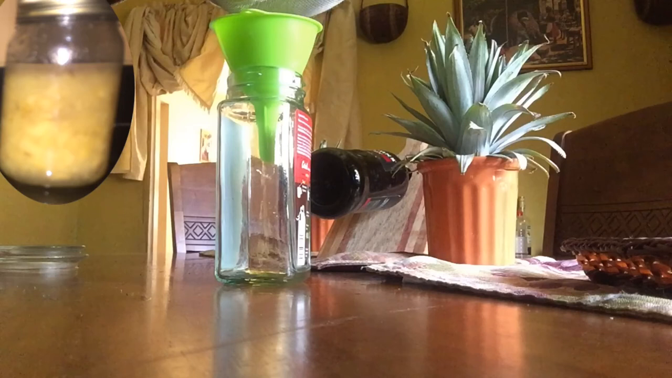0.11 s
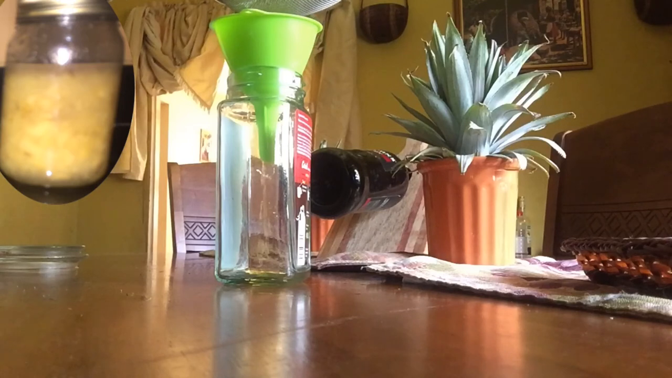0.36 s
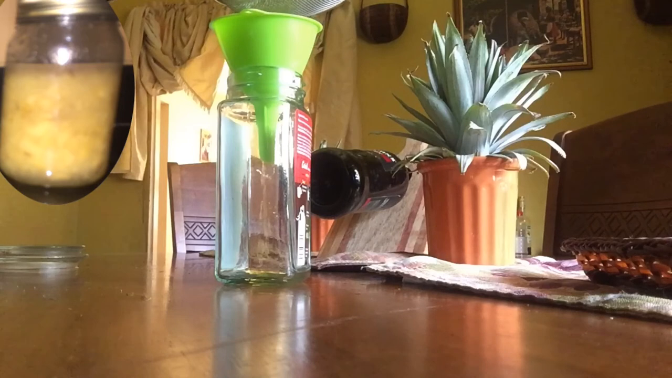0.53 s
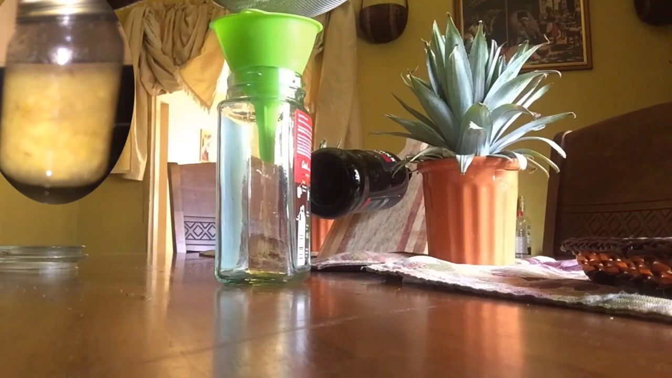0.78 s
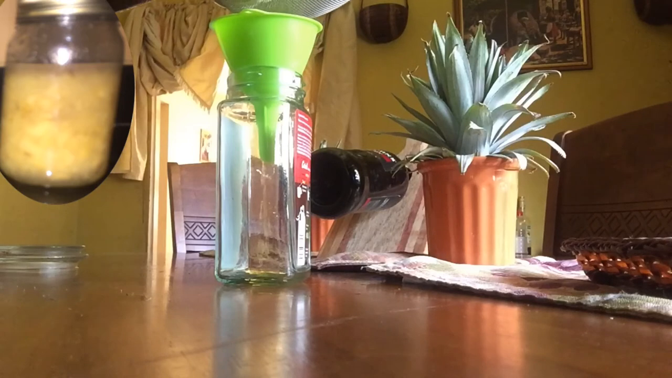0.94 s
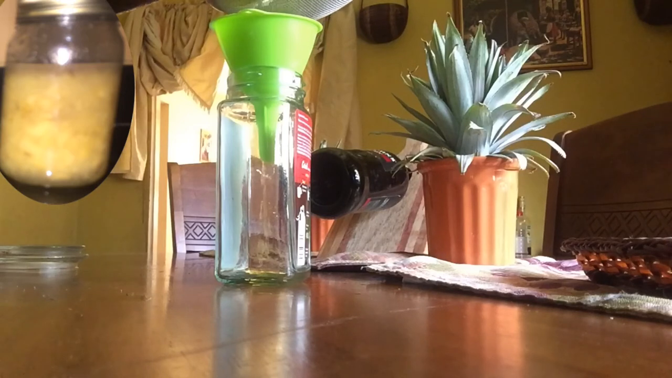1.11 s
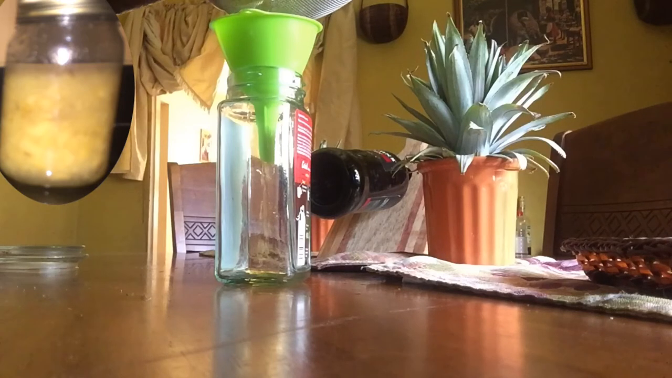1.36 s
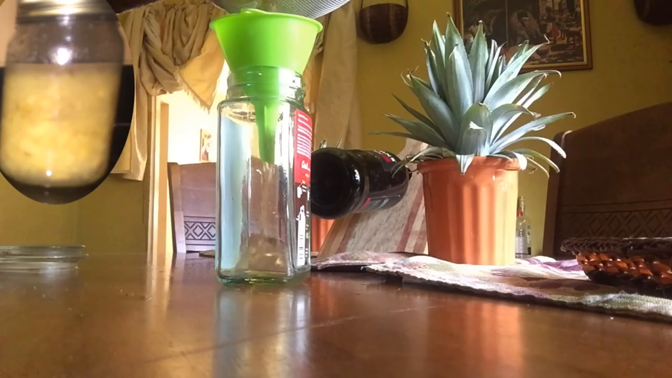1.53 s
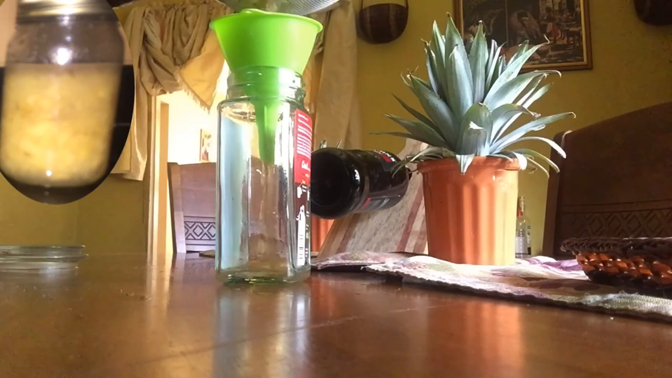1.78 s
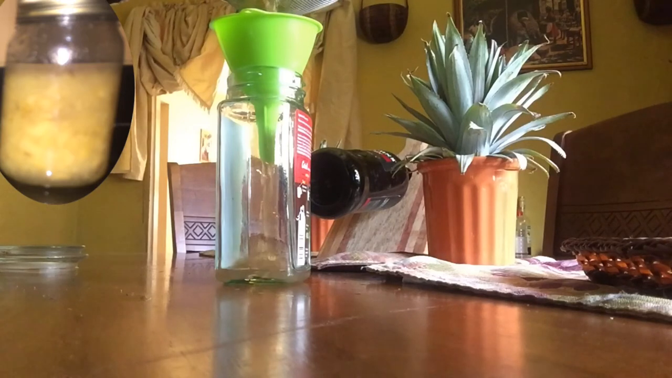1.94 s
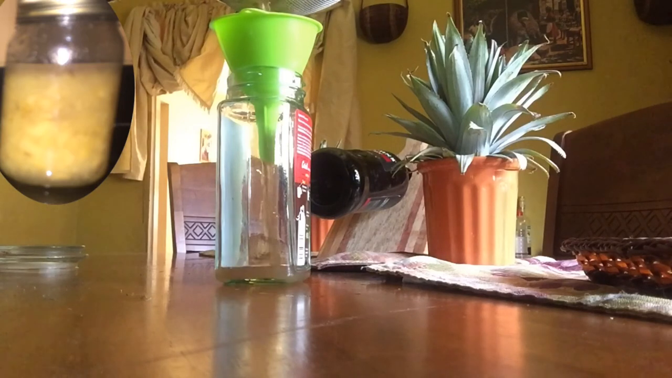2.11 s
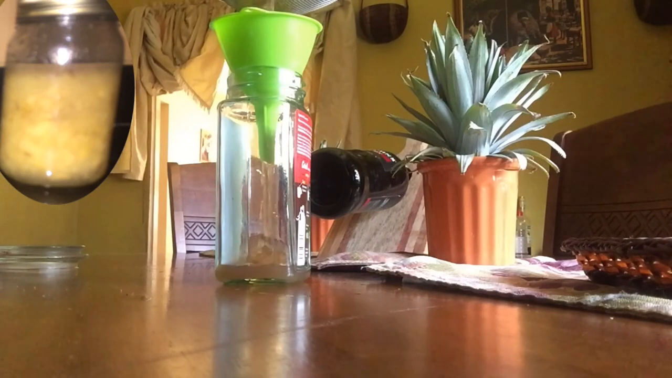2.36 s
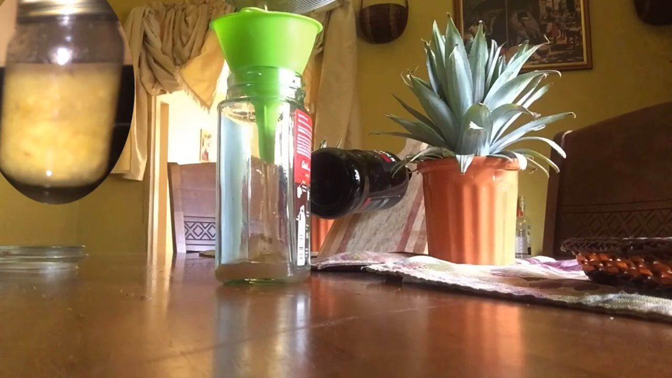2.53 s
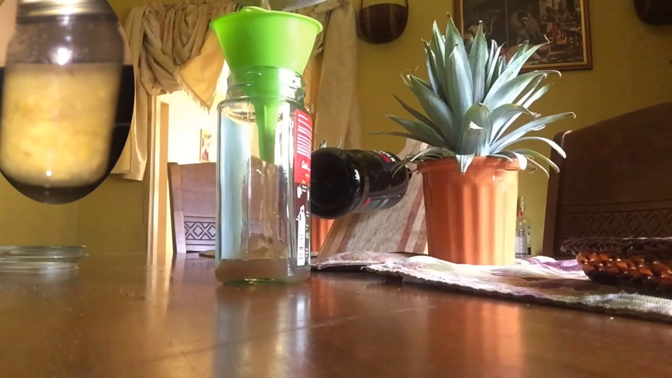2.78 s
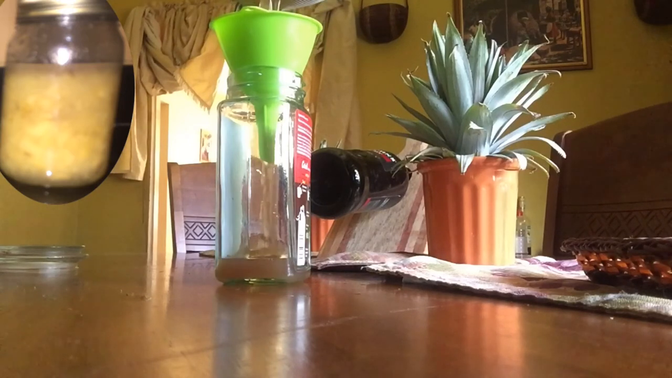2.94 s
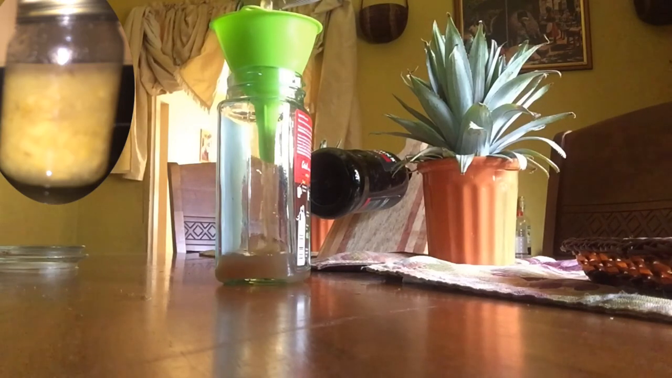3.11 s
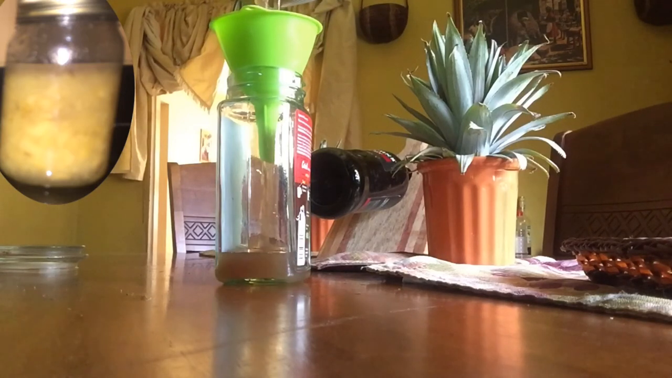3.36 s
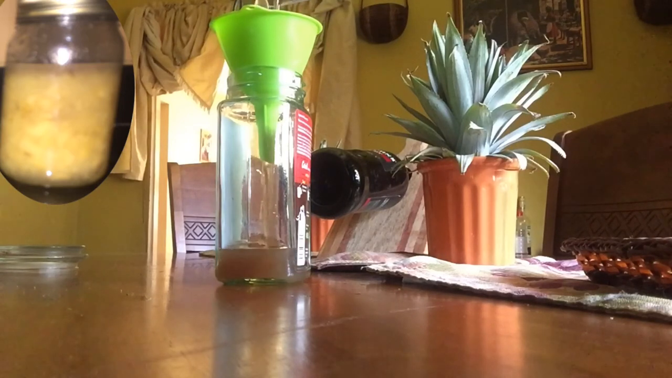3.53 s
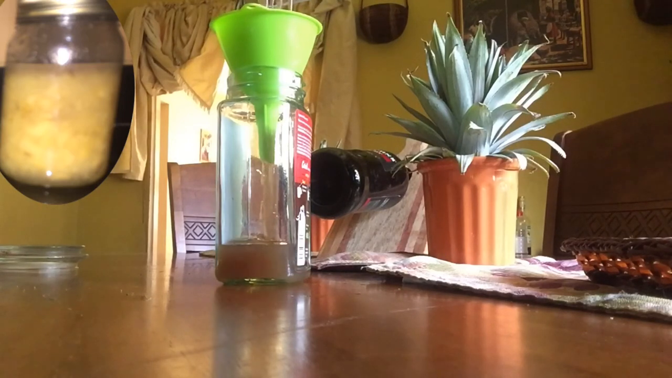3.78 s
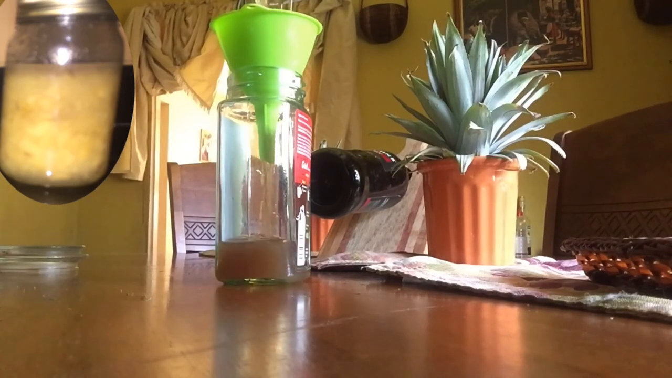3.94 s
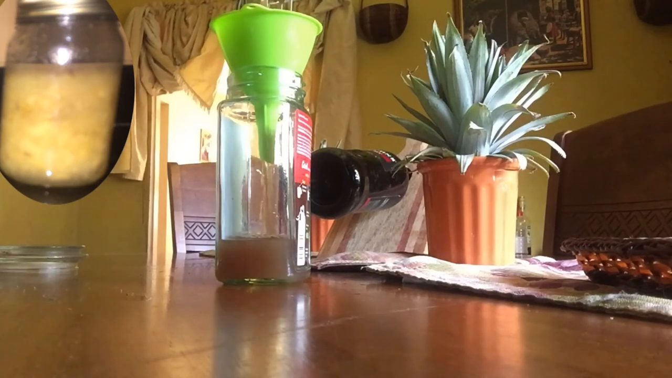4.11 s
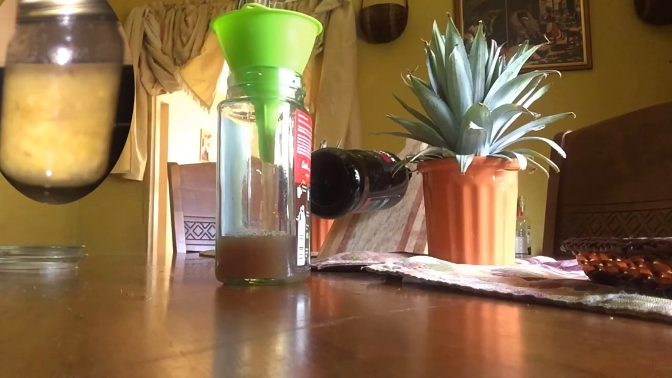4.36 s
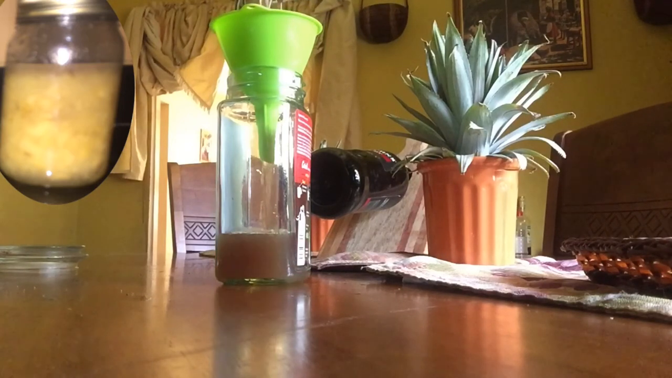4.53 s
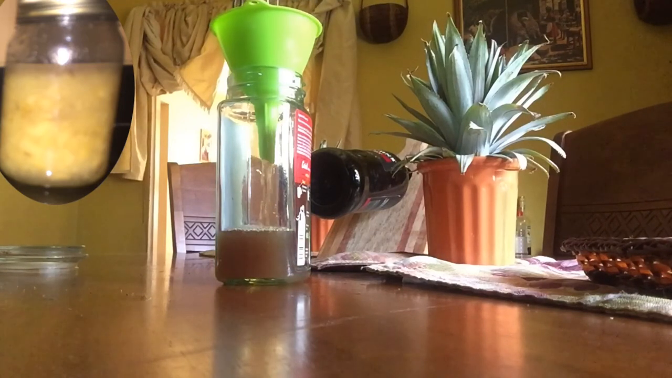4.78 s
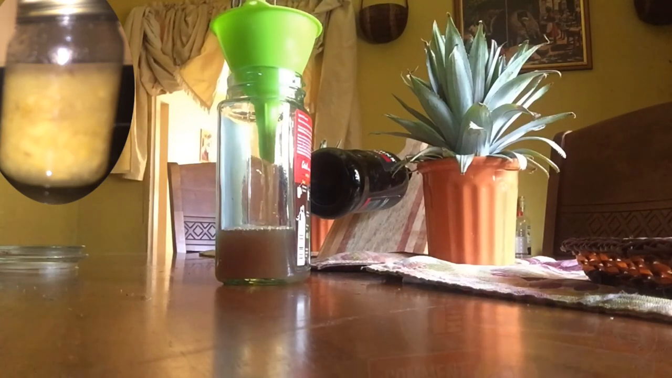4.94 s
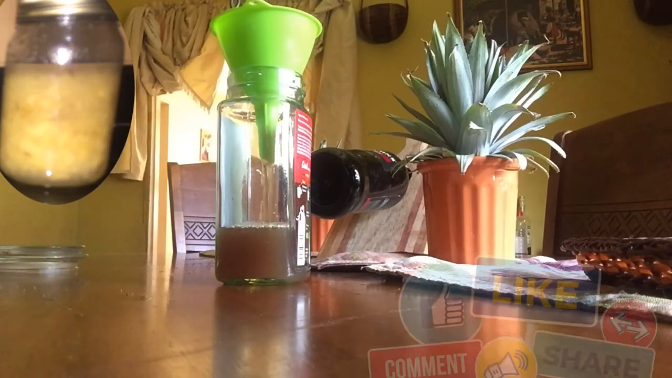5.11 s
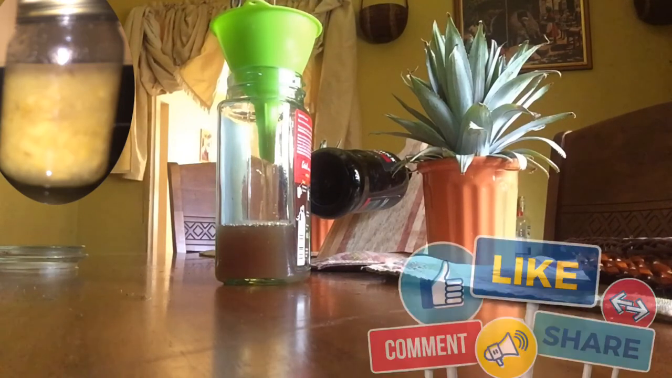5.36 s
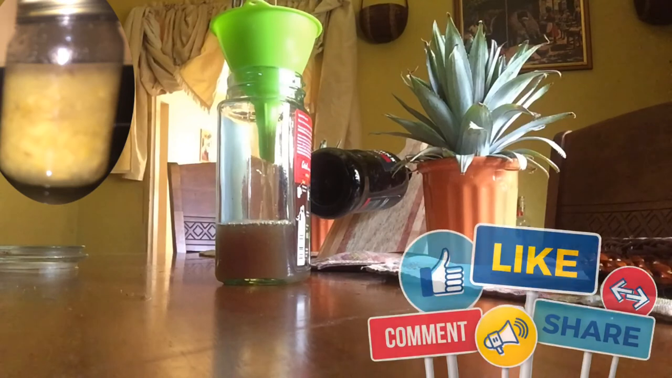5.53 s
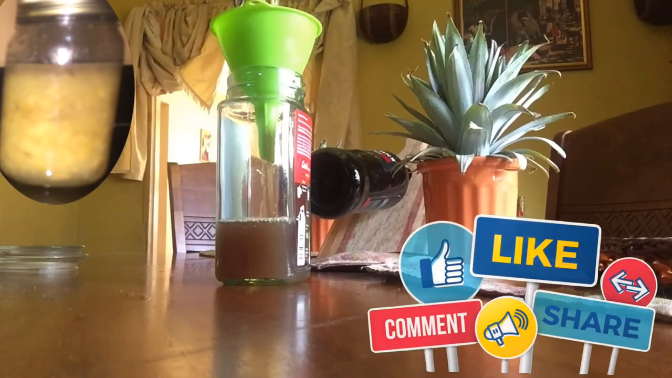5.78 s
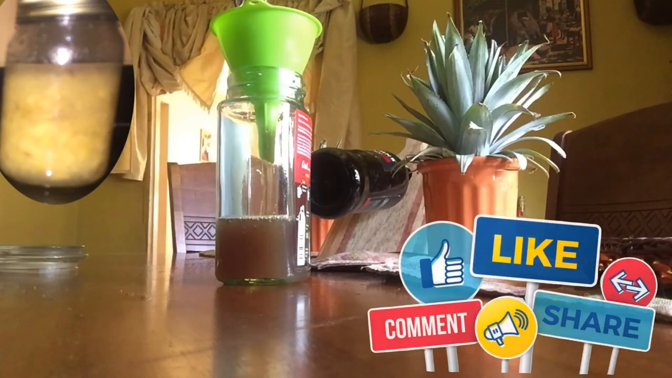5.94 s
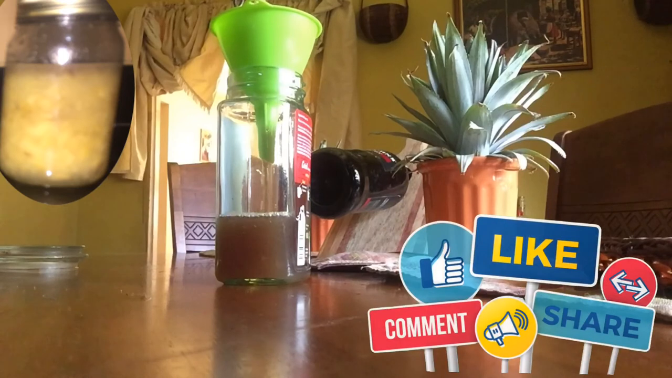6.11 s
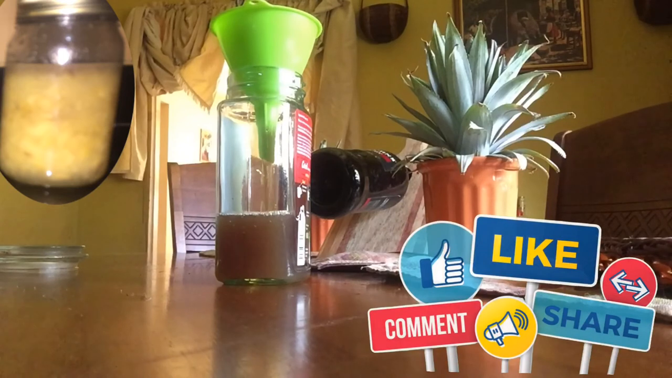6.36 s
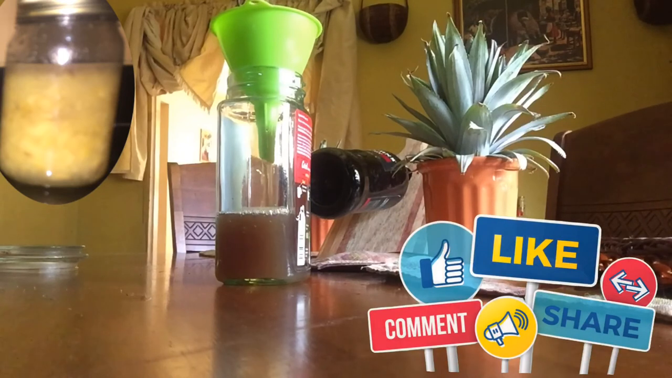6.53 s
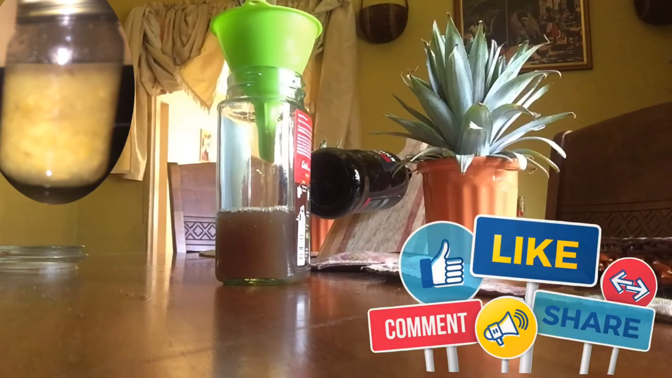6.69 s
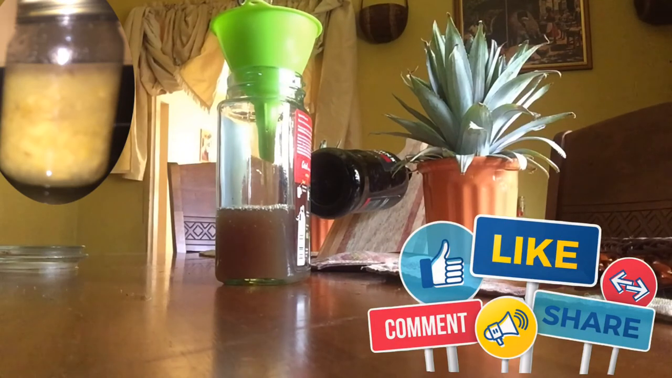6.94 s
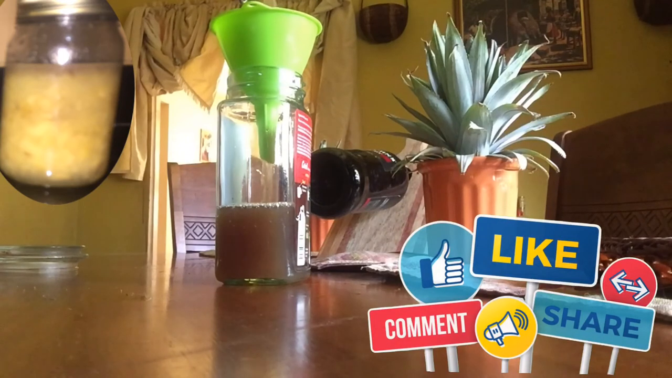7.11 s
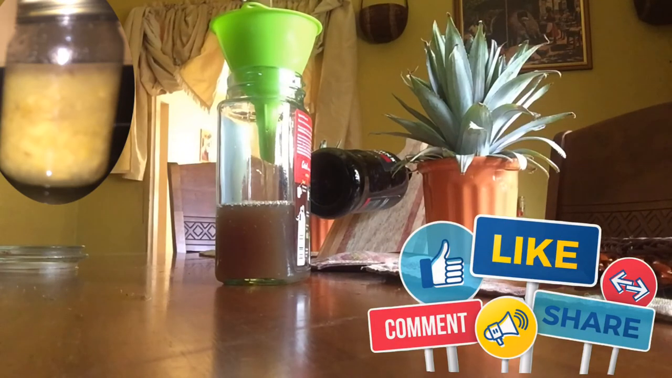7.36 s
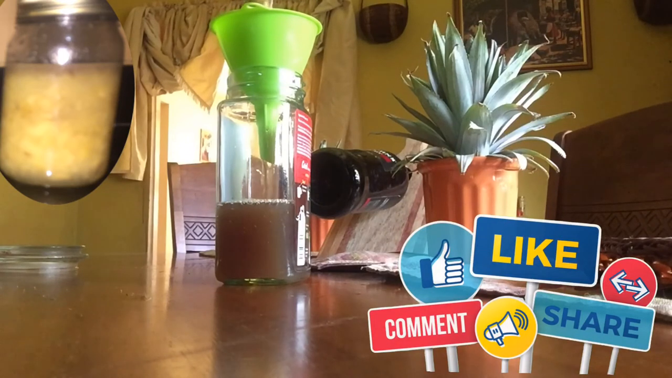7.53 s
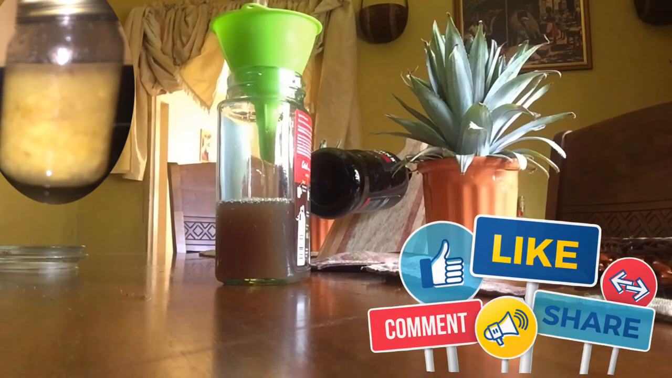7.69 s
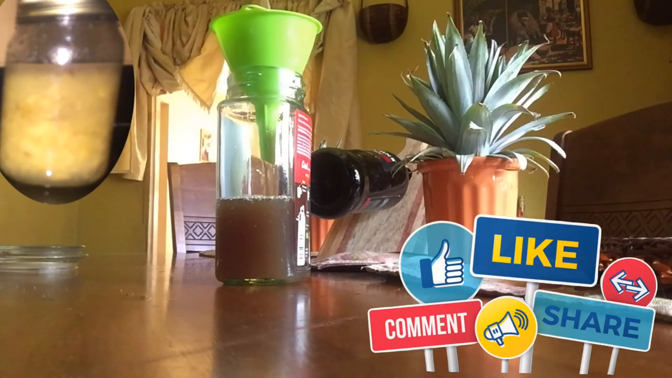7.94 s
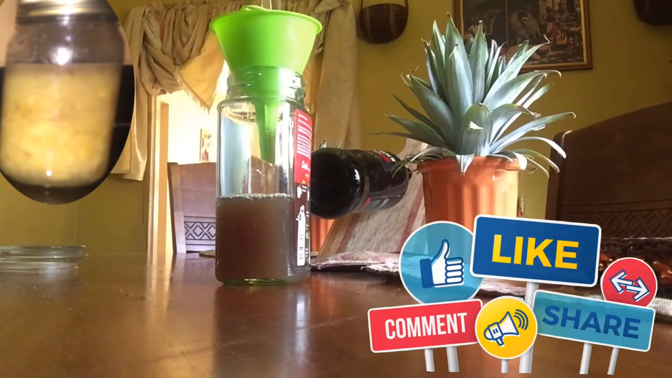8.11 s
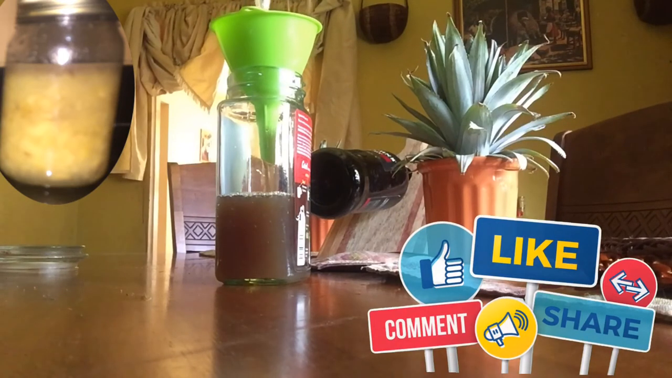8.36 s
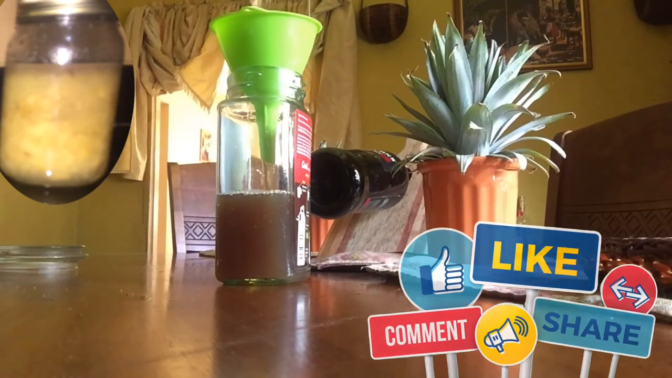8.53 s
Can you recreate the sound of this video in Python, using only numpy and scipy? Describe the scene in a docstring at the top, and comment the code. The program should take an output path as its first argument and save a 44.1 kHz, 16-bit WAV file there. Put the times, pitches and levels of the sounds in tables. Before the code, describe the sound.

After a quiet hissing start, a thin wet trickle thickens into throaty glugging as a bottle fills through a funnel, with small ticks and plips.

```python
"""Room hiss and a low wavering hum are heard first; a gliding drone soon joins them.
Syrup then runs through a sieve and a plastic funnel into a glass bottle, pattering and spitting: bubble swarms
and noise bursts. Once the spout floods, gulps of air glug: damped sines for bubble, overtone and bottle air.
Decaying sines also make small bubbles, sharp ticks of drops and sieve, and chinks of sieve and funnel on the neck.
The room answers the pour with a diffuse tail; the recorder cuts the top."""
import sys
import numpy as np
from scipy import signal
from scipy.fft import rfft, irfft
from scipy.io import wavfile

SR = 44100
rng = np.random.default_rng(int(sys.argv[2]) if len(sys.argv) > 2 else 0)


def persist_wave(psi):
    """Save psi, clipped to +-1, as 16-bit WAV."""
    counts = np.round(np.clip(psi, -1, 1) * 32767).astype(np.int16)
    wavfile.write(sys.argv[1], SR, np.atleast_2d(counts).T)


N = 378449
TIME = np.arange(N) / SR

# Levels in the tables are relative: the gains set in scene() are added to them.
# gulps of air: (time [s], level [dB], bubble pitch [Hz], overtone level above the glug [dB])
GULPS = [(2.565, -36, 622, -15), (2.618, -30.5, 478, -28), (3.156, -33.5, 654, -16),
         (3.238, -33.5, 700, -5.5), (3.396, -24.5, 680, -24), (3.466, -16, 672, -31),
         (3.609, -9.5, 664, -43), (3.655, -22, 597, -38), (3.676, -19, 560, -24), (3.783, -19.5, 662, -24),
         (3.826, -17.5, 594, -34), (3.924, -18, 474, -26), (3.954, -16.5, 620, -37),
         (4.003, -14.5, 634, -29), (4.103, -16.5, 629, -16), (4.17, -8.5, 574, -28), (4.2, -11.5, 581, -39),
         (4.24, -9.5, 582, -23.5), (4.33, -14.5, 509, -19.5), (4.378, -10.5, 587, -28),
         (4.452, -13, 486, -29), (4.529, -17, 465, -36), (4.555, -17.5, 503, -33), (4.62, -8.5, 444, -24),
         (4.652, -13.5, 455, -32), (4.692, -13.5, 493, -43), (4.873, -20, 660, -25.5),
         (4.907, -19.5, 632, -23.5), (4.964, -6.5, 648, -32), (5.059, -21.5, 644, -20.5),
         (5.177, -13.5, 598, -28.5), (5.224, -20, 570, -32), (5.248, -11, 570, -40),
         (5.333, -16.5, 612, -25.5), (5.363, -11, 609, -19.5), (5.392, -10, 615, -23.5),
         (5.48, -22, 680, -18), (5.537, -7, 579, -30.5), (5.611, -19.5, 589, -25), (5.711, -16, 667, -23),
         (5.777, -3.5, 599, -21), (5.847, -20.5, 650, -16), (5.874, -15.5, 610, -26),
         (5.927, -14, 650, -42), (6.021, -14.5, 664, -20), (6.229, -27, 500, -41), (6.291, -26, 495, -26),
         (6.349, -24.5, 575, -18), (6.421, -26.5, 612, -25), (6.551, -6.5, 598, -27),
         (6.661, -18, 662, -23.5), (6.784, -21.5, 632, -27), (6.861, -19.5, 623, -27),
         (6.904, -26, 650, -14), (7.005, -14.5, 600, -27), (7.082, -19.5, 600, -29), (7.146, -12, 604, -20),
         (7.186, -22.5, 617, -22), (7.236, -16, 585, -20), (7.264, -19.5, 509, -30),
         (7.402, -15, 586, -17.5), (7.494, -23, 653, -24), (7.555, -22.5, 660, -15),
         (7.587, -13.5, 637, -15), (7.732, -19.5, 604, -21), (7.823, -14, 600, -19.5),
         (7.928, -24, 600, -21.5), (7.988, -18, 606, -18), (8.104, -25, 570, -31),
         (8.135, -19.5, 580, -17.5), (8.264, -19, 397, -20.5)]
# modes of the bottle's air, rung by every gulp: (frequency [Hz], level [dB], t60 [s])
BOTTLE_MODES = [(256.7, -1.8, 0.165), (97.2, -19, 0.14), (188, -26, 0.038), (343.3, -6, 0.12)]
# narrow resonances that hold on to the bubbles' sound: (frequency [Hz], width [Hz], level [dB])
HOLLOW_RESONANCES = [(491, 12, 0.5), (584, 11, -8.5), (665.5, 20, -5), (936, 25, 3), (1130, 50, -12.5)]
# colour of the slosh: (frequency [Hz], level [dB])
SLOSH_COLOUR = [(250, -7.5), (420, 6.5), (700, 1.5), (900, -9), (1200, -11.5), (1500, -31), (2500, -39.5),
                (3200, -35.5)]
# the running stream: (time [s], flow into the bottle [dB], spatter on the funnel [dB])
STREAM_LEVELS = [(1.4, -51, -82), (1.62, -50, -85.5), (2.88, -44.5, -65.5), (3.22, -38, -56),
                 (3.68, -38.5, -59), (3.98, -33.5, -52.5), (4.16, -32.5, -58.5), (4.5, -30.5, -56.5),
                 (4.92, -34, -60.5), (5.8, -35.5, -60), (6.36, -40, -67), (6.98, -41, -69),
                 (7.3, -35.5, -64.5), (7.78, -41.5, -67.5), (8.04, -40.5, -66), (8.58, -45, -68.5)]
# gushes from the sieve: (time [s], half length [s], extra level [dB])
SIEVE_GUSHES = [(1.68, 0.09, 7.5), (2.076, 0.056, 13), (2.456, 0.093, 7), (3.856, 0.13, 6),
                (4.588, 0.064, 7), (7.188, .07, 7.5)]
# colour of the stream's larger bubbles: (frequency [Hz], level [dB])
BURBLE_COLOUR = [(430, -10.5), (660, -0.5), (800, -18), (950, -14), (1160, -12), (1400, -26)]
# colour of the patter: (frequency [Hz], level [dB])
PATTER_COLOUR = [(1400, -6.5), (1750, -12), (2100, -8.5), (2430, -1), (2750, -6), (3080, 0), (3400, -10.5),
                 (4200, -14)]
# colour of fizz, spit and cracks: (frequency [Hz], level [dB])
SPRAY_COLOUR = [(1500, -27), (2500, 2.5), (4000, -16), (5500, -10.5), (7200, 0.5), (9000, 0.5), (10200, -4),
                (11500, -1.5), (16000, -12)]
# sharp ticks, drops on the funnel and taps of the sieve:
# (time [s], treble level [dB], funnel level [dB], ping pitch [Hz])
SHARP_TICKS = [(1.6831, -43, -76, 8540), (1.9897, -40, -40.5, 11300), (2.2089, -28.5, -49.5, 8300),
               (2.6194, -33, -54, 12800), (2.6888, -42, -49, 9530), (2.9894, -37.5, -36.5, 7040),
               (3.1662, -34, -56, 6800), (3.2797, -30, -48, 6900), (3.469, -38.5, -43, 9000),
               (3.609, -38.5, -59, 8840), (3.6302, -44, -44, 6550), (3.832, -37, -34.5, 7250),
               (3.8538, -30.5, -32.5, 7850), (3.8697, -27.5, -31.5, 7660), (4.0928, -39, -39, 7380),
               (4.1065, -28.5, -50, 7400), (4.1208, -42, -30.5, 7250), (4.1297, -28.5, -31, 6840),
               (4.2867, -48, -37.5, 7310), (4.3575, -42, -53, 13400), (4.4225, -49, -36.5, 7460),
               (4.4886, -52, -38, 10900), (4.5324, -49, -34, 6470), (4.9622, -35, -61, 6470),
               (5.0764, -44, -33.5, 7170), (5.248, -36.5, -55, 12500), (5.925, -37, -59, 9600),
               (5.9688, -43, -46.5, 8330), (6.0062, -27, -34, 6670), (6.1429, -35.5, -55, 9800),
               (6.548, -35.5, -45.5, 10950), (6.781, -43.5, -47, 8270), (7.0034, -40.5, -49, 12200),
               (7.0768, -44, -48, 9550), (7.1021, -33, -38.5, 7130), (7.8234, -34, -41, 9900),
               (8.1532, -44, -45, 9350), (8.174, -41, -34.5, 6700), (8.4714, -36.5, -69, 6200)]
# modes of the plastic funnel's wall: (frequency [Hz], level [dB], t60 [s])
FUNNEL_MODES = [(1522, -6.5, 0.049), (1790, -4.5, 0.02), (1995, -4, 0.041), (2444, 2.5, 0.038),
                (2520, 6.5, 0.01), (2993, -6.5, 0.044), (4150, -18.5, 0.026)]
# the clearest single bubbles: (time [s], level [dB], pitch [Hz])
SINGLE_BUBBLES = [(3.4, -33, 806), (3.43, -33, 830), (3.47, -29, 784), (3.53, -31.5, 760),
                  (4.597, -36, 2530), (4.653, -38.5, 2980), (4.723, -41.5, 2960), (4.809, -44, 3010),
                  (4.879, -41, 1890), (4.74, -42, 1870), (4.91, -43, 1950), (5.167, -41, 2510),
                  (5.219, -43.5, 2380), (5.334, -41, 2960), (5.723, -43, 2460), (5.847, -38.5, 2810),
                  (5.886, -37, 2990), (6.036, -43, 3760), (6.79, -44, 2930), (6.985, -50, 2810),
                  (7.435, -42.5, 2700), (7.49, -44, 2760), (7.585, -36, 2697)]
# touches of sieve and funnel against the bottle's neck: (time [s], level [dB], brightest pitch [Hz])
NECK_TOUCHES = [(1.735, -58, 4700), (2.044, -51.5, 8800), (2.446, -41.5, 5230), (2.448, -49, 3840),
                (2.494, -46, 3840), (2.624, -45.5, 3100), (2.635, -56, 11300), (2.9, -56, 3120),
                (2.997, -45, 3120), (3.065, -54.5, 5600), (7.079, -51, 5070), (7.819, -40.5, 3700)]
# modes rung by those touches: (frequency [Hz], level [dB], t60 [s])
GLASS_MODES = [(3106, 0, .17), (3838, -4, .11), (4441, -11, .12), (4776, -7, .2), (5100, -4, .14),
               (5566, -2, .19), (7200, -7, .18), (8200, -3, .13), (9100, -5, .08), (11350, -3, .14)]
# the low drone: (time [s], level [dB])
DRONE_LEVELS = [(0, -76), (.6, -52), (1.1, -51.5), (1.7, -56), (3.7, -51.5), (3.95, -32.5), (4.6, -34),
                (4.85, -45), (5.5, -44.5), (6.1, -50), (6.85, -43), (7.3, -42.5), (7.7, -54), (8.2, -38.5),
                (8.58, -46.5)]
# spectrum of the room's hiss: (frequency [Hz], level per hertz [dB])
ROOM_SPECTRUM = [(100, -8.5), (150, -15), (195, -3.5), (230, -13), (295, 0), (360, -12.5), (450, -21.5),
                 (700, -21.5), (1100, -29.5), (2000, -35), (5000, -39), (7000, -41.5), (10500, -44),
                 (16000, -46.5)]

OVERTONE_HZ, OVERTONE_SPREAD = 1123, .045  # every glug's overtone, and its scatter as a share
AIR_CORNER_HZ, AIR_DB_PER_OCTAVE = 560.5, -26  # bubbles above this pitch are too small to thump the air fully
AIR_DB_PER_S = 0.65  # the thump grows as the bottle fills
AIR_HOLD_S = .07  # how long the bottle's air rings before it drops off sharply
# a high mode of the air column climbs from the flooding on
COLUMN_HZ, COLUMN_HZ_PER_S, COLUMN_TOP_HZ = 1638, 150, 2286
POUR_S = 1.37  # the syrup reaches the funnel
FLOOD_S, FLOOD_SCALE_S = 2.88, .2  # the spout floods, and the time scale of that change
DRONE_HZ, DRONE_OCTAVES_PER_S = 41.66, .176  # pitch at time 0, and its steady climb
DRONE_SINKS_S, DRONE_SINK_SCALE_S, DRONE_END_HZ = 7.0, 0.25, 48.5  # then it sinks to its last pitch
HUM_HZ, HUM_DB = 76.4, -55.5
HUM_WAVER, HUM_WAVERS_PER_S = 0.0355, 3  # scatter as a share of the pitch, and new random values a second
ROOM_TONE_DB = -53.5
TOP_HZ = 15900  # the recorder's upper limit


def glugs(bubble_db, air_db, overtone_db, bubble_t60, overtone_t60, damping, lead_s,
          slosh_db, slosh_t60, drop_share, column_db, column_t60):
    """Coupled resonance: each gulp rings as a bubble, thumps the bottle's air and sloshes."""
    bubble, air, slosh = np.zeros(N), np.zeros(N), np.zeros(N)
    # after AIR_HOLD_S the ring of the air drops off sharply by drop_share
    hold = 1 - np.clip(drop_share, 0, 1) * (1 - np.exp(-(TIME / AIR_HOLD_S) ** 6))
    for s, db, hz, top_db in GULPS:
        octaves_above = max(np.log2(hz / AIR_CORNER_HZ), 0)
        thump_db = AIR_DB_PER_OCTAVE * octaves_above + AIR_DB_PER_S * (s - FLOOD_S) + air_db
        # the more a bubble drives the air, the faster it dies
        t60 = bubble_t60 * np.clip(undb(-damping * thump_db), .5, 2)
        column_hz = min(COLUMN_HZ + COLUMN_HZ_PER_S * (s - FLOOD_S), COLUMN_TOP_HZ)
        add(air, s, undb(db + column_db) * ring(column_hz, column_t60, attack_s=0.0065))

        add(bubble, s - lead_s, undb(db + bubble_db) * ring(hz, t60, attack_s=0.0036, glide=0.047))
        top_hz = OVERTONE_HZ * (1 + OVERTONE_SPREAD * rng.standard_normal())
        overtone = ring(top_hz, overtone_t60, attack_s=0.0032, glide=0.025)
        add(bubble, s - lead_s, undb(db + top_db + overtone_db) * overtone)
        add(slosh, s, undb(db + slosh_db) * burst(slosh_t60))

        sway = 1 + 0.018 * rng.standard_normal()  # the plug of syrup in the spout is never quite the same
        for mode_hz, mode_db, mode_t60 in BOTTLE_MODES:
            thump = ring(mode_hz * sway, mode_t60, attack_s=0.0051)
            add(air, s - lead_s, undb(db + thump_db + mode_db) * thump * hold[:len(thump)])
    held = np.zeros(N)
    for hz, width, db in HOLLOW_RESONANCES:
        held += undb(db) * signal.lfilter(*signal.iirpeak(hz, hz / width, SR), bubble)
    return bubble + air + held + colour(slosh, SLOSH_COLOUR)


def films(fizz_db, spit_db, spit_t60, shed_db, shed_t60, shed_s, count):
    """Film rupture: the film over each gulp bursts with a thin spit and sheds a few small bubbles."""
    out = np.zeros(N)
    for s, db, _, top_db in GULPS:
        spit_size, spit_octave = rng.random(2)
        spit = signal.lfilter(*signal.iirpeak(7000 * 2 ** spit_octave, 6, SR), burst(spit_t60))
        add(out, s, undb(fizz_db[int(s * SR)] + spit_db) * spit_size * spit)
        for late, octave, size in rng.random((count, 3)):
            pop = ring(1550 * 2 ** octave, shed_t60, attack_s=0.0065)
            add(out, s + shed_s * late ** 2, undb((db + top_db) / 2 + shed_db) * size * pop)
    return out


def flow(dry_burble_db, dry_fizz_db, before_db):
    """Flow regimes as levels of gurgle, burble, patter and fizz: unflooded, it fizzes more and burbles less."""
    surge_db = before_db * (1 - step(TIME, POUR_S, .04))
    for s, half_s, db in SIEVE_GUSHES:
        surge_db = surge_db + db * np.exp(-((TIME - s) / half_s) ** 2)
    flow_db, spatter_db = np.array(curves(STREAM_LEVELS)) + surge_db
    dry = 1 - step(TIME, FLOOD_S, FLOOD_SCALE_S)
    return flow_db, flow_db + dry_burble_db * dry, spatter_db, spatter_db + dry_fizz_db * dry


def stream(levels, gurgle_gain_db, burble_gain_db, patter_gain_db, fizz_gain_db, splash_db, spit_db):
    """Air entrainment: falling syrup folds in bubbles of many sizes, and droplets spatter on the funnel."""
    gurgle_db, burble_db, patter_db, fizz_db = levels
    gurgle = bubbles(count=1500, lo_hz=196.0, hi_hz=393.7, cycles=13.7, swell_cycles=1.4, range_db=8, glide=0.029)
    burble = bubbles(count=2400, lo_hz=426.0, hi_hz=1441, cycles=28.4, swell_cycles=1.6, range_db=19.5, glide=0.051)
    patter = bubbles(count=2200, lo_hz=1400, hi_hz=4200, cycles=80, swell_cycles=14, range_db=24, glide=0)
    splash = bubbles(count=5000, lo_hz=1700, hi_hz=3500, cycles=7, swell_cycles=2, range_db=20, glide=0)
    fizz = bubbles(count=3400, lo_hz=4830, hi_hz=15200, cycles=60, swell_cycles=4.8, range_db=35.5, glide=0)
    spit = bubbles(count=2000, lo_hz=6100, hi_hz=14000, cycles=16, swell_cycles=2, range_db=39.0, glide=0)
    spatter = patter + undb(splash_db) * smear(splash, t60=0.032)
    spray = smear(fizz, t60=0.069) + undb(spit_db) * spit
    return (undb(gurgle_db + gurgle_gain_db) * gurgle
            + undb(burble_db + burble_gain_db) * unit(colour(burble, BURBLE_COLOUR))
            + undb(patter_db + patter_gain_db) * unit(colour(spatter, PATTER_COLOUR))
            + undb(fizz_db + fizz_gain_db) * unit(colour(spray, SPRAY_COLOUR)))


def bubbles(count, lo_hz, hi_hz, cycles, swell_cycles, range_db, glide):
    """Superposition of bubble resonances of random pitch, many weak and few strong, at rms 1."""
    out = np.zeros(N)
    for k, (when, pitch, size, life) in enumerate(rng.random((count, 4))):
        hz = lo_hz * (hi_hz / lo_hz) ** pitch
        pop = ring(hz, cycles * (.5 + life) / hz, swell_cycles / hz, glide)
        s = (k + 4 * when - 2) / count * N / SR  # even spacing, jittered by up to two places
        add(out, s, undb(-range_db * np.sqrt(size)) * pop)
    return unit(out)


def ticks(strikes, crack_db, ping_db, funnel_db, crack_t60, ping_t60):
    """Impact excitation: a tiny crack, a high ping and the short modal ring of the funnel's wall."""
    cracks, rings = np.zeros(N), np.zeros(N)
    for s, treble_db, body_db, ping_hz in strikes:
        add(cracks, s, undb(treble_db + crack_db) * burst(crack_t60))
        add(rings, s, undb(treble_db + ping_db) * ring(ping_hz, ping_t60, attack_s=0.00029))
        for mode_hz, mode_db, t60 in FUNNEL_MODES:
            wet_hz = mode_hz * (1 + 0.017 * rng.standard_normal())  # the syrup loads the wall unevenly
            add(rings, s, undb(body_db + funnel_db + mode_db) * ring(wet_hz, t60, attack_s=0.0016))
    return colour(cracks, SPRAY_COLOUR) + rings


def drips(spatter_db, count, first_s, last_s, treble_db, funnel_db, range_db):
    """Random arrivals: lesser drops that follow the spatter's level; rows like those of SHARP_TICKS."""
    rows = []
    for k, (when, size, body, octave) in enumerate(rng.random((count, 4))):
        s = first_s + (last_s - first_s) * (k + when) / count
        db = np.interp(s, TIME, spatter_db)
        drop_treble_db = db + treble_db - range_db * size
        drop_funnel_db = db + funnel_db - range_db * body
        rows.append((s, drop_treble_db, drop_funnel_db, 6500 * 2 ** octave))
    return rows


def plips(gain_db, t60, attack_s, glide):
    """Bubble resonance: small bubbles swell softly in the thick liquid and rise a little in pitch."""
    out = np.zeros(N)
    for s, db, hz in SINGLE_BUBBLES:
        add(out, s, undb(db + gain_db) * ring(hz, t60, attack_s, glide))
    return out


def chinks(gain_db, db_per_octave, scrape_db, scrape_t60):
    """Modal excitation: each touch scrapes briefly and wakes mostly the modes near its brightest pitch."""
    out = np.zeros(N)
    for s, db, bright_hz in NECK_TOUCHES:
        scrape = signal.lfilter(*signal.iirpeak(bright_hz, 20, SR), burst(scrape_t60))
        add(out, s, undb(db + scrape_db) * scrape)
        for hz, mode_db, t60 in GLASS_MODES:
            fall_db = db_per_octave * abs(np.log2(hz / bright_hz))
            add(out, s, undb(db + gain_db + mode_db - fall_db) * ring(hz, t60, attack_s=0.0011))
    return out


def hiss(s, width_s, db, lo_hz, hi_hz):
    """Band-limited noise under a bell-shaped envelope: a soft hiss swells and fades once."""
    swell = np.exp(-((TIME - s) / width_s) ** 2)
    return undb(db) * swell * unit(colour(rng.standard_normal(N), [(lo_hz, 0), (hi_hz, 0)]))


def kitchen(x, wet_db, t60, gap_s):
    """Reverberation: walls answer after a short gap with a diffuse, decaying tail."""
    tail = np.concatenate([np.zeros(int(gap_s * SR)), burst(t60)])
    wall_colour = [(80, 12.0), (250, -1), (700, 0.5), (2500, -2), (8000, -2.0), (16000, 1)]  # (Hz, dB)
    echo = colour(signal.oaconvolve(x, tail)[:N], wall_colour)
    return x + undb(wet_db) * echo


def background(drone_db, octave_db, octave_from_s):
    """Frequency modulation: a climbing, then sinking drone with its octave, and a wavering hum, under hiss."""
    sunk = step(TIME, DRONE_SINKS_S, DRONE_SINK_SCALE_S)
    drone_hz = (1 - sunk) * DRONE_HZ * 2 ** (DRONE_OCTAVES_PER_S * TIME) + sunk * DRONE_END_HZ
    phase = 2 * np.pi * np.cumsum(drone_hz) / SR
    drone = undb(curves(DRONE_LEVELS)[0] + drone_db) * unit(np.sin(phase)) * step(TIME, .4, 0.087)
    octave = undb(octave_db) * step(TIME, octave_from_s, 0.15) * np.sin(2 * phase)

    waver = np.interp(TIME * HUM_WAVERS_PER_S, np.arange(100), rng.standard_normal(100))
    hum_hz = HUM_HZ * (1 + HUM_WAVER * waver)
    hum = undb(HUM_DB) * unit(np.sin(2 * np.pi * np.cumsum(hum_hz) / SR))
    room_hiss = undb(ROOM_TONE_DB) * unit(colour(rng.standard_normal(N), ROOM_SPECTRUM))
    return drone + octave + hum + room_hiss


def ring(hz, t60, attack_s, glide=0):
    """Damped oscillation that swells over attack_s; its pitch rises by the share glide over one t60."""
    t = np.arange(int((t60 + attack_s) * SR) + 2) / SR
    swell = np.sin(np.pi / 2 * np.minimum(t / attack_s, 1)) ** 2
    decay = np.exp(-np.log(1000) * t / t60)
    return swell * decay * np.sin(2 * np.pi * hz * t * (1 + glide * t / t60 / 2))


def burst(t60):
    """Exponential decay of noise, with energy 1."""
    t = np.arange(int(t60 * SR) + 2) / SR
    x = rng.standard_normal(len(t)) * np.exp(-np.log(1000) * t / t60)
    return x / np.linalg.norm(x)


def smear(x, t60):
    """Multiple reflection: sound bounces about inside funnel and bottle before it gets out; rms 1."""
    return unit(signal.oaconvolve(x, burst(t60))[:N])


def colour(x, points, size=4096):
    """Minimum-phase filter through (frequency [Hz], level [dB]) points, falling steeply outside them."""
    hz, db = np.transpose(points)
    octave = np.log2(np.maximum(np.arange(size // 2 + 1), .5) * SR / size)
    outside = np.abs(octave - np.clip(octave, np.log2(hz[0]), np.log2(hz[-1])))
    gain_db = np.interp(octave, np.log2(hz), db) - np.minimum(36 * outside, 60)
    # folding the cepstrum onto positive times makes the filter causal
    cepstrum = irfft(np.log(undb(gain_db)))
    cepstrum[1:size // 2] *= 2
    cepstrum[size // 2 + 1:] = 0
    return signal.oaconvolve(x, irfft(np.exp(rfft(cepstrum))))[:len(x)]


def step(t, s, scale_s):
    """Logistic transition from 0 to 1, halfway at time s."""
    return .5 + .5 * np.tanh((t - s) / scale_s / 2)


def curves(table):
    """Linear interpolation in time of each column after the first."""
    s, *columns = np.transpose(table)
    return [np.interp(TIME, s, column) for column in columns]


def add(out, s, sound):
    """Superposition: mix a sound in at time s."""
    i = int(np.clip(s * SR, 0, N - 1))
    out[i:i + len(sound)] += sound[:N - i]


def undb(db):
    """Decibel law: level to amplitude gain."""
    return 10 ** (np.asarray(db) / 20)


def unit(x):
    """Normalization to rms 1."""
    return x / np.sqrt(np.mean(x ** 2))


def scene():
    """Superposition of the pour, reverberated by the kitchen, and the background."""
    levels = flow(dry_burble_db=-11.5, dry_fizz_db=11, before_db=-16)
    patter_db, fizz_db = levels[2:]
    strikes = SHARP_TICKS + drips(patter_db, count=70, first_s=2.7, last_s=5.3,
                                  treble_db=17.5, funnel_db=14.5, range_db=22.5)
    pour = glugs(bubble_db=-1.0, air_db=-4.5, overtone_db=5.5, bubble_t60=0.029, overtone_t60=0.064,
                 damping=0.92, lead_s=.0003, slosh_db=21, slosh_t60=0.085, drop_share=0.6,
                 column_db=-36, column_t60=0.056)
    pour += films(fizz_db, spit_db=30.5, spit_t60=.035, shed_db=-23.0, shed_t60=0.029, shed_s=0.033, count=4)
    pour += stream(levels, gurgle_gain_db=-4.5, burble_gain_db=-7, patter_gain_db=-2.5, fizz_gain_db=-9.5,
                   splash_db=-3.5, spit_db=-12)
    pour += ticks(strikes, crack_db=11.5, ping_db=-4.0, funnel_db=-2, crack_t60=0.022, ping_t60=0.011)
    pour += plips(gain_db=7.0, t60=0.04, attack_s=0.0071, glide=0.057)
    pour += chinks(gain_db=-1.5, db_per_octave=40, scrape_db=36, scrape_t60=0.08)
    pour += hiss(s=5.52, width_s=0.077, db=-65.5, lo_hz=3160, hi_hz=6600)
    room = kitchen(pour, wet_db=-10.5, t60=0.29, gap_s=0.0086)
    return (room + background(drone_db=-1.5, octave_db=-54.5, octave_from_s=1.7))[None]


def record(dry):
    """Low-pass filtering: the recorder cuts the top with a steep elliptic filter."""
    return signal.sosfilt(signal.ellip(10, .2, 80, TOP_HZ, fs=SR, output="sos"), dry)


dry = scene()
out = record(dry)
persist_wave(out)
```